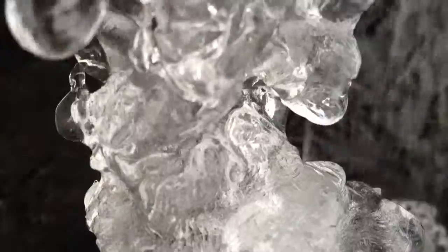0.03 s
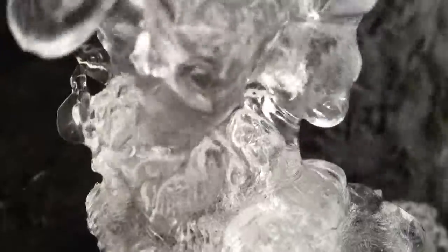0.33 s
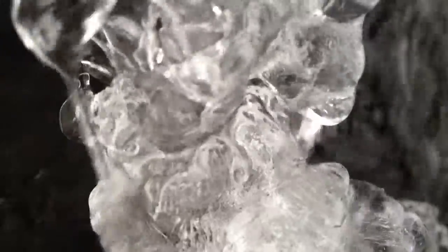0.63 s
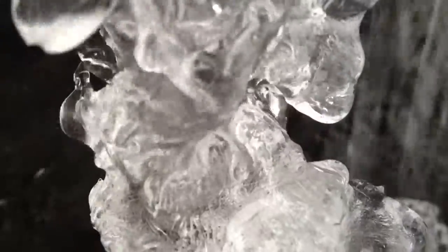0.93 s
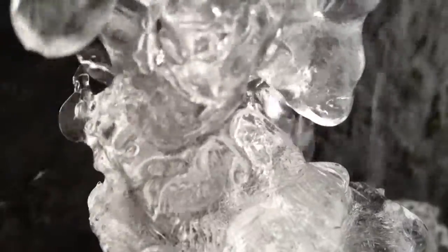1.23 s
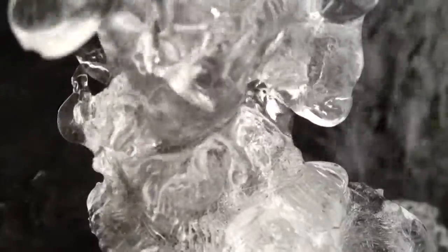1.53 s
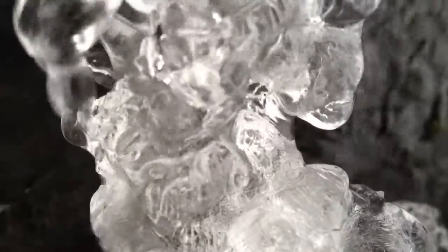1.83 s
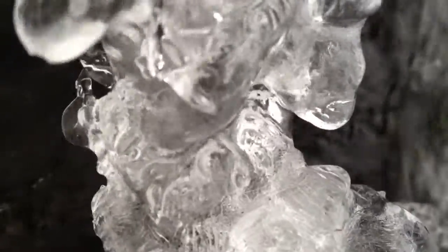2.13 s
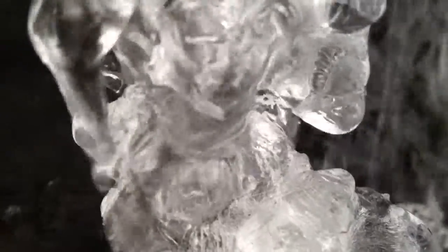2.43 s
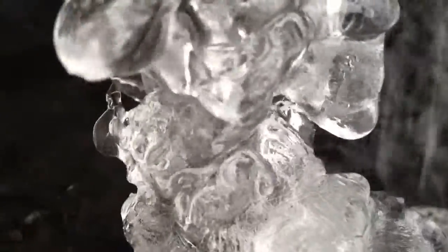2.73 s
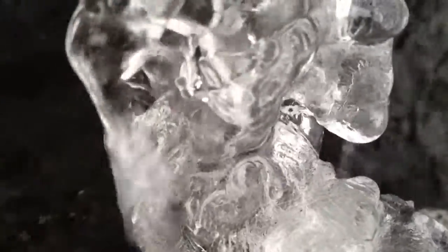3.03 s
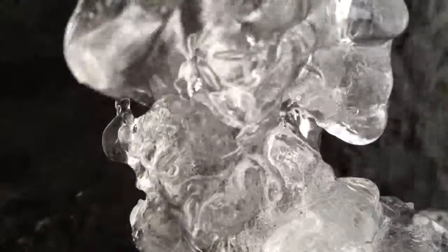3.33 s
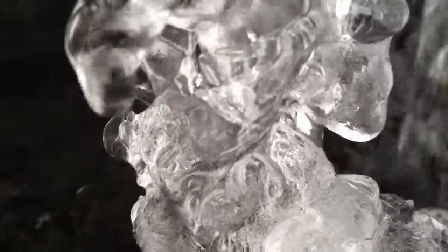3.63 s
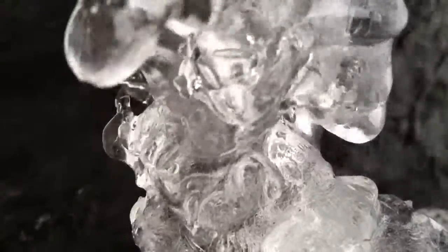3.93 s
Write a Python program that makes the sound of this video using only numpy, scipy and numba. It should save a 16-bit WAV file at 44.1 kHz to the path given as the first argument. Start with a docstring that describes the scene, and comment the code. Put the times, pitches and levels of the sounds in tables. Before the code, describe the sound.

Water trickles and splashes steadily over a lump of ice outdoors, close to the microphone. Tiny bubbles fizz in surges while drops splat and plink irregularly, over the soft rush of a stream further off.

```python
"""Meltwater running and splashing over a lump of ice, outdoors, one microphone close to the ice.
After a moment of silence the stream is there, rushing softly further off over a faint low drone.
Up close, countless tiny bubbles fizz with the surges of the flow, drops splat on the ice, and trapped
bubbles ring for a few cycles, most chirping upwards. The drone grows over the first two seconds;
the low rush dips briefly just before the end."""
import sys
import numpy as np
from scipy import signal
from scipy.fft import rfft, irfft
from scipy.io import wavfile
from numba import njit

SR = 44100
rng = np.random.default_rng(int(sys.argv[2]) if len(sys.argv) > 2 else 0)


def generate_wav(signal):
    """Clip the signal to [-1, 1] and save it as 16-bit WAV at the path in sys.argv[1]."""
    frames = np.transpose(np.atleast_2d(signal))
    scaled = np.clip(frames, -1, 1) * 32767
    pcm = np.round(scaled).astype(np.int16)
    wavfile.write(sys.argv[1], SR, pcm)


N = 176400
TOP_HZ = 15200

# Surges of the flow, as relative levels of the fizz: time_s, middle_db, treble_db, top_db
FLOW_SURGES = [(0.09, -53.5, -48, -46), (0.14, -48.5, -48, -42), (0.2, -44.5, -44.5, -50),
               (0.27, -53.0, -49, -45.5), (0.43, -44.5, -42, -54), (0.5, -52, -45.5, -52),
               (0.67, -50, -45, -44), (0.735, -48, -51, -46.5), (0.84, -47, -42.5, -52),
               (0.94, -48.5, -47.5, -47), (1.06, -53, -42.5, -44.5), (1.13, -49, -44, -50),
               (1.25, -46, -41, -44.5), (1.33, -49, -47, -51), (1.55, -48, -40.5, -43.5),
               (1.68, -55, -50, -53), (1.77, -48, -40.5, -46), (1.89, -50.5, -43, -46),
               (1.93, -46, -38, -46), (1.98, -48, -45.5, -50), (2.03, -42.5, -37.5, -51),
               (2.14, -50.5, -44, -44), (2.18, -41.5, -47, -46.0), (2.22, -48, -40, -45),
               (2.28, -50, -45, -47), (2.34, -44.5, -41.5, -44), (2.43, -50, -51, -43),
               (2.49, -52.5, -41, -48), (2.6, -45, -46, -48), (2.65, -47, -44.5, -44.5),
               (2.76, -44.5, -45, -47), (2.85, -44.5, -48, -50), (2.93, -50.5, -45, -44.5),
               (3.24, -46, -46, -47.5), (3.43, -49, -43, -44.5), (3.5, -48.5, -46, -49),
               (3.62, -46, -42, -47), (3.74, -59, -47.5, -51), (3.79, -45.5, -42.5, -47),
               (4.0, -55.5, -41.5, -50)]


def from_db(db):
    """Decibels to gain."""
    return 10 ** (np.asarray(db) / 20)


def rms_one(x):
    """Scale to an rms of 1."""
    return x / np.sqrt(np.mean(x ** 2) + 1e-20)


def in_time(rows):
    """Each column of a curve at every sample."""
    times, *columns = np.transpose(rows)
    return [np.interp(np.arange(N) / SR, times, column) for column in columns]


def at_hz(points, hz):
    """Read a spectrum on a log-frequency axis."""
    points_hz, db = np.transpose(points)
    return np.interp(np.log(hz + 1e-9), np.log(points_hz), db)


def add(out, start_s, sound):
    """Mix a sound in at a time."""
    first = max(int(start_s * SR), 0)
    part = out[first:first + len(sound)]
    part += sound[:len(part)]


def band(x, low_hz, high_hz):
    """Gentle band-pass."""
    edges_hz = [low_hz, min(high_hz, SR / 2 - 1000)]
    return signal.sosfilt(signal.butter(2, edges_hz, "band", fs=SR, output="sos"), x)


def wobble(period_s):
    """A random curve with a new value every period; rms 1."""
    return rms_one(np.interp(np.arange(N) / SR / period_s, np.arange(N), rng.standard_normal(N)))


def drone():
    """A faint low drone in the background: a narrow band of noise."""
    # Growth of the drone: time_s, gain_db
    growth = [(0, -10), (1.0, -7), (1.9, -2), (4, -1.5)]
    centre_hz, half_width_hz = 97.6, 5.9
    hz = np.arange(N // 2 + 1) * SR / N
    hum = irfft(rfft(rng.standard_normal(N)) / (1 + ((hz - centre_hz) / half_width_hz) ** 2), N)
    return from_db(-71.5 + in_time(growth)[0]) * rms_one(hum)


def stream():
    """The smooth rush of water further off, its hiss surging a little with the flow."""
    # Spectrum of the stream: frequency_hz, density_db
    colour = [(25, -29), (60, -29), (82, -19), (115, -6), (150, 1.5), (200, 3.5), (280, -0.5), (430, -2),
              (660, -0.5), (950, -5), (1400, -5.5), (1950, -6.5), (2600, -11.5), (3500, -13.5),
              (6700, -7.5), (10000, -6), (15000, -7)]
    # Swell of the low rush: time_s, gain_db
    rush_levels = [(0.25, -2.5), (0.55, 1), (1.12, -2), (1.7, 0), (2.0, -0.5), (2.7, -1), (3.25, 0.5),
                   (3.58, 1), (3.71, -4.5), (3.85, 1)]
    hz = np.arange(N // 2 + 1) * SR / N
    water = rms_one(irfft(rfft(rng.standard_normal(N)) * from_db(at_hz(colour, hz)), N))
    hiss = irfft(rfft(water) * hz ** 2 / (hz ** 2 + 2500 ** 2), N)
    rush = irfft(rfft(water) / (1 + (hz / 450) ** 4), N)
    treble_db = in_time(FLOW_SURGES)[1]
    surge = from_db(0.33 * (treble_db - treble_db.mean()))   # a third of the fizz's treble swing
    swell = from_db(in_time(rush_levels)[0])
    return from_db(-46) * (water + (surge - 1) * hiss + (swell - 1) * rush)


@njit
def chirps(starts_s, peaks, pitches_hz, swells_s, rises, waver):
    """Each bubble is a sine that swells, dies away and rises in pitch as it nears the surface."""
    out = np.zeros(N)
    for k in range(len(starts_s)):
        first, phase = max(int(starts_s[k] * SR), 0), 0.
        for i in range(min(int(6 * swells_s[k] * SR), N - first)):
            age = i / (swells_s[k] * SR)   # 1 at the bubble's loudest
            hz = pitches_hz[k] * (1 + rises[k] * (age - 1) + waver[first + i])
            phase += 2 * np.pi * min(hz, .45 * SR) / SR
            envelope = (age * np.exp(1 - age)) ** 2
            out[first + i] += peaks[k] * envelope * np.sin(phase)
    return out


def pitch_waver():
    """The fast waver of ringing bubbles, as a share of their pitch."""
    return 0.05 * wobble(period_s=.0004)


def swarm(low_hz, high_hz, count, cycles, rise, spread_db):
    """Small bubbles ring at random moments, with random strengths and pitches; rms 1."""
    # Spectrum of the fizz: frequency_hz, density_db
    colour = [(1300, -15), (1900, 0.5), (2600, -8), (3200, 2), (4000, -7), (4700, 1), (5400, -7),
              (6700, 5.5), (7400, -8), (8600, 4), (9700, -11), (12500, -6), (15300, -13)]
    when, pitch, strength, length, glide, sign = rng.random((count, 6)).T
    hz = low_hz + (high_hz - low_hz) * pitch
    strength_db = spread_db * np.minimum(-np.log(1 - strength), 2.8)   # many weak, a few strong
    peaks = from_db(strength_db + at_hz(colour, hz)) * np.sqrt(hz) * np.sign(sign - .5)
    swells_s = cycles * 2 ** (2 * length - 1) / hz
    return rms_one(chirps(when * N / SR, peaks, hz, swells_s, rise * glide, pitch_waver()))


def patter(low_hz, high_hz, count, decay_s, spread_db):
    """Fine droplets tick on the ice, each a tiny burst of noise; rms 1."""
    when, strength = rng.random((count, 2)).T
    hits = np.zeros(N)
    hits[(when * N).astype(int)] = from_db(spread_db * np.minimum(-np.log(1 - strength), 3))
    envelope = signal.lfilter([1], [1, -np.exp(-1 / (decay_s * SR))], hits + 1e-18)
    return rms_one(band(envelope * rng.standard_normal(N), low_hz, high_hz))


def fizz():
    """Over a steady gurgle, ever smaller bubbles and dry droplet ticks surge and spurt with the flow."""
    gurgle = swarm(487, 1419, count=700, cycles=2.83, rise=0.13, spread_db=1)
    trickle = swarm(1416, 4060, count=3200, cycles=2.4, rise=0.16, spread_db=5)
    sizzle = swarm(4160, 9170, count=3600, cycles=2.94, rise=0.11, spread_db=4.5)
    mist = swarm(10100, 14700, count=1800, cycles=2.5, rise=0.058, spread_db=3)
    clicks = patter(3400, 8600, count=450, decay_s=.0004, spread_db=3)
    ticks = patter(5160, TOP_HZ, count=380, decay_s=.0018, spread_db=4.5)
    middle_db, treble_db, top_db = in_time(FLOW_SURGES)
    middle = from_db(middle_db - 5.5) * trickle
    treble = from_db(treble_db - 2.5) * sizzle + from_db(treble_db - 10) * clicks
    top = from_db(top_db - 2.5) * mist + from_db(top_db - 2) * ticks
    spurts = from_db(2 * wobble(period_s=.011))
    return from_db(-59) * gurgle + spurts * (middle + treble + top)


def splats():
    """Each drop bursts on the ice in a short crack, followed by a thin spray."""
    # Drops hitting the ice: start_s, relative_level_db, centre_hz
    drops = [(0.0919, -26.5, 5750), (0.164, -25, 6500), (0.1744, -26, 7500), (0.251, -26, 9000),
             (0.2931, -25, 11500), (0.3737, -22.5, 9800), (0.3825, -26, 7500), (0.4104, -21.5, 8500),
             (0.6687, -24.5, 8200), (0.7505, -32, 8500), (0.7777, -24.5, 9800), (0.828, -27, 7200),
             (0.845, -27, 5960), (1.0664, -25, 10000), (1.2728, -24, 7500), (1.3024, -24, 9000),
             (1.3952, -24, 9800), (1.444, -31, 8000), (1.7081, -21, 8300), (1.835, -26, 7200),
             (2.4688, -26, 6760), (2.5102, -27.5, 7000), (2.5755, -27, 5500), (2.6384, -25.5, 9500),
             (2.8815, -30.5, 7040), (2.9453, -22, 12000), (3.1716, -24, 8500), (3.2595, -20, 12100),
             (3.3, -22, 9000), (3.4381, -25.5, 12700), (3.4487, -19.5, 10100), (3.593, -25.5, 6000),
             (3.6314, -18.5, 7750), (3.7632, -29, 7500), (3.9013, -25, 7500), (3.9557, -21, 8400)]
    attack_s, crack_decay_s, spray_decay_s = .0002, .00053, .0042
    width = 1.65   # band edge over centre
    out, t = np.zeros(N), np.arange(SR // 25) / SR
    crack = np.exp(-t / crack_decay_s)
    spray = from_db(-15.5) * np.exp(-t / spray_decay_s)
    envelope = np.minimum(t / attack_s, 1) * (crack + spray)
    for start_s, level_db, centre_hz in drops:
        noise = rms_one(band(rng.standard_normal(len(t)), centre_hz / width, centre_hz * width))
        add(out, start_s, from_db(level_db + 0.5) * envelope * noise)
    return out


def bubbles():
    """Single trapped bubbles ring close to the microphone: the plinks and pips that stand out."""
    # Clear bubbles: start_s, peak_db, pitch_hz, swell_s, rise_share (of the pitch, per swell time)
    plinks = [(0.1019, -18, 13000, 0.00018, 0.061), (0.1295, -36, 4350, 0.0012, 0.05),
              (0.1832, -35.5, 706, 0.004, 0.071), (0.205, -35.5, 3100, 0.0011, 0.052),
              (0.2235, -35, 3560, 0.001, 0.1), (0.2374, -22.5, 6360, 0.0008, 0.26),
              (0.2932, -18, 8340, 0.00024, 0), (0.2981, -31.5, 3370, 0.0008, 0.11),
              (0.312, -32.5, 4200, 0.0019, 0.071), (0.343, -41, 1360, 0.0021, 0),
              (0.3738, -14, 7600, 0.0003, 0.1), (0.377, -39, 2230, 0.0014, 0.15),
              (0.383, -21.5, 6900, 0.00084, 0.38), (0.4113, -13, 7460, 0.00022, 0.15),
              (0.4423, -34.5, 3250, 0.0013, 0.35), (0.593, -35, 3910, 0.0016, 0),
              (0.624, -41, 656, 0.003, 0.035), (0.6254, -32, 1720, 0.00075, 0.59),
              (0.7027, -21, 14000, 0.00027, 0.13), (0.7507, -27, 8500, 0.00024, 0.053),
              (0.768, -24.5, 8550, 0.00093, 0.13), (0.792, -39.5, 2120, 0.0021, 0.017),
              (0.8992, -30.5, 3670, 0.0016, 0.11), (0.9515, -33, 3560, 0.0014, 0.15),
              (0.987, -38, 1364, 0.0041, 0.15), (1.0161, -23.5, 8250, 0.00062, 0.023),
              (1.0665, -21.5, 7800, 0.00098, 0.18), (1.0847, -23.5, 5700, 0.00058, 0.48),
              (1.0996, -34, 3830, 0.0029, 0.062), (1.1095, -27, 5600, 0.0012, 0.054),
              (1.1438, -38.5, 2820, 0.004, 0.23), (1.3, -28, 2420, 0.0023, 0.27),
              (1.3037, -24.5, 4270, 0.0012, 0.065), (1.3154, -21.5, 6180, 0.001, 0.22),
              (1.3687, -25.5, 5500, 0.00047, 0.65), (1.3946, -24, 11020, 0.00079, 0.026),
              (1.435, -39, 797, 0.0065, 0.0066), (1.472, -39.5, 1730, 0.0025, 0.1),
              (1.5275, -30.5, 2840, 0.0017, 0.045), (1.6061, -20, 9600, 0.00018, 0.15),
              (1.709, -19, 6650, 0.00059, 0.046), (1.7199, -33, 2340, 0.0006, 0.41),
              (1.856, -20.5, 6440, 0.00024, 0), (1.8656, -23, 8100, 0.00049, 0.08),
              (1.9194, -19, 8600, 0.00043, 0), (1.9435, -33.5, 3420, 0.0013, 0.008),
              (1.9823, -34.5, 636, 0.0044, 0.014), (2.019, -21, 13190, 0.00019, 0.069),
              (2.1488, -23.5, 8200, 0.00077, 0.35), (2.1874, -33, 1830, 0.0013, 0.22),
              (2.2613, -22, 13190, 0.00019, 0), (2.338, -24.5, 6050, 0.0008, 0.1),
              (2.4473, -36.5, 1430, 0.0054, 0.12), (2.4687, -33, 4300, 0.0014, 0.21),
              (2.4753, -24, 5600, 0.0007, 0.26), (2.488, -26, 5300, 0.0006, 0.1),
              (2.4946, -18, 5370, 0.00089, 0.21), (2.51, -16.5, 6950, 0.00015, 0),
              (2.5456, -25, 11900, 0.00037, 0.052), (2.5652, -25, 4270, 0.00038, 0.15),
              (2.6271, -30.5, 1900, 0.0012, 0.047), (2.6976, -38, 1626, 0.0032, 0.063),
              (2.7276, -18, 8470, 0.00073, 0.18), (2.743, -27, 4770, 0.00047, 0),
              (2.744, -40.5, 1660, 0.006, 0.02), (2.7522, -23.5, 5800, 0.00052, 0.067),
              (2.7809, -15, 5600, 0.00019, 0.36), (2.7925, -34, 3150, 0.00052, 0.29),
              (2.8858, -24.5, 6100, 0.00055, 0.16), (2.9025, -29.5, 3280, 0.0017, 0.14),
              (2.9106, -24, 8400, 0.00065, 0.21), (2.9191, -22.5, 5830, 0.00029, 0.45),
              (2.9373, -36, 1710, 0.0015, 0.29), (2.9468, -11, 7600, 0.00029, 0.025),
              (2.9603, -38, 1820, 0.0012, 0.08), (2.9796, -23, 11020, 0.00058, 0.38),
              (2.995, -37, 1715, 0.0029, 0.079), (2.999, -25.5, 4960, 0.00057, 0),
              (3.0553, -23.5, 6800, 0.00079, 0), (3.1502, -26, 5730, 0.0009, 0.35),
              (3.2437, -42, 1010, 0.0038, 0), (3.2578, -16.5, 13100, 0.0003, 0),
              (3.3007, -22.5, 7640, 0.00084, 0.48), (3.3838, -23, 13900, 0.00029, 0),
              (3.4269, -43.5, 1106, 0.0044, 0.00066), (3.4377, -20.5, 8200, 0.00038, 0.034),
              (3.4481, -18, 11900, 0.00034, 0.13), (3.5161, -22.5, 4770, 0.00039, 0.017),
              (3.5354, -28, 6100, 0.00055, 0.08), (3.5644, -23, 6300, 0.00062, 0.25),
              (3.593, -25, 2770, 0.00042, 0.35), (3.6317, -19, 5220, 0.00053, 0.28),
              (3.6495, -25.5, 6450, 0.00062, 0.004), (3.6827, -23, 9100, 0.00037, 0),
              (3.6966, -30.5, 3200, 0.00056, 0.36), (3.716, -44, 876, 0.00449, 0.031),
              (3.772, -26, 4930, 0.00071, 0.16), (3.7874, -22, 6900, 0.00035, 0.011),
              (3.8054, -38.5, 660, 0.0033, 0), (3.8235, -38, 1760, 0.00232, 0.036),
              (3.84, -22, 13190, 0.0003, 0), (3.8548, -31, 3230, 0.0013, 0.08),
              (3.8979, -26, 9210, 0.00032, 0), (3.9214, -22.5, 6500, 0.00093, 0.2),
              (3.9563, -23, 7800, 0.0009, 0.33), (3.9763, -27, 7900, 0.00057, 0)]
    start_s, peak_db, pitch_hz, swell_s, rise_share = np.array(plinks, float).T.copy()
    return chirps(start_s, from_db(peak_db), pitch_hz, swell_s, rise_share, pitch_waver())


def off_the_ice(direct):
    """Add early reflections from ice and running water, changing with the ripples."""
    decay_s, lowest_hz = .0034, 1760   # the small faces return no lows
    delays_s = np.linspace(.0008, .012, 14) + rng.uniform(0, .0007, 14)
    gains = np.exp(-delays_s / decay_s)
    echoes = np.zeros(N)
    for delay_s, gain in zip(delays_s, gains / np.linalg.norm(gains)):
        add(echoes, delay_s, gain * wobble(period_s=.006) * direct)
    return direct + from_db(-6.5) * band(echoes, lowest_hz, TOP_HZ)


def scene():
    """Water on the ice up close, the stream and the drone behind; mono."""
    close_water = off_the_ice(bubbles() + splats() + fizz())
    return (close_water + stream() + drone())[None]


def record(dry):
    """The microphone opens after a moment of silence; the top is cut steeply."""
    silence_s, fade_s = .083, .003
    fade_in = np.clip((np.arange(N) / SR - silence_s) / fade_s, 0, 1)
    low_pass = signal.ellip(10, .2, 80, TOP_HZ, fs=SR, output="sos")
    return signal.sosfilt(low_pass, dry * fade_in)


dry = scene()
out = record(dry)
generate_wav(out)
```